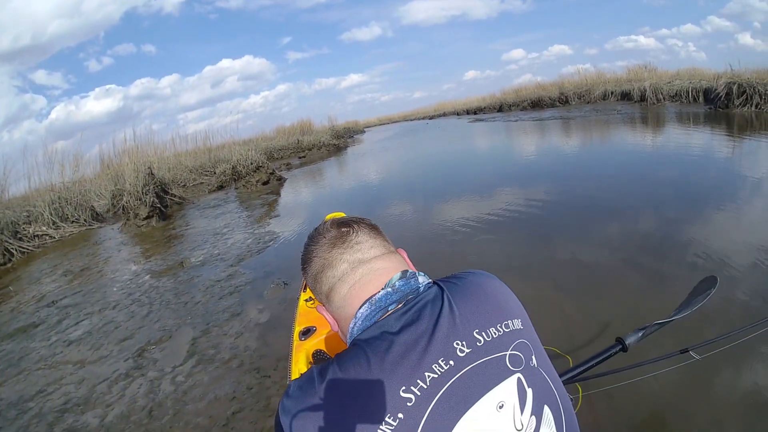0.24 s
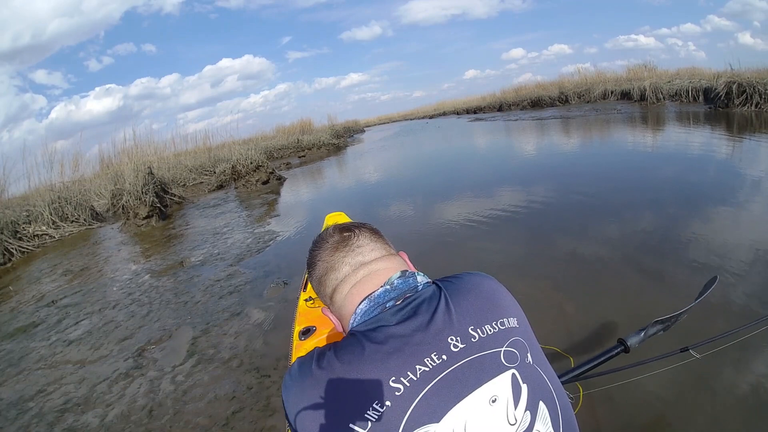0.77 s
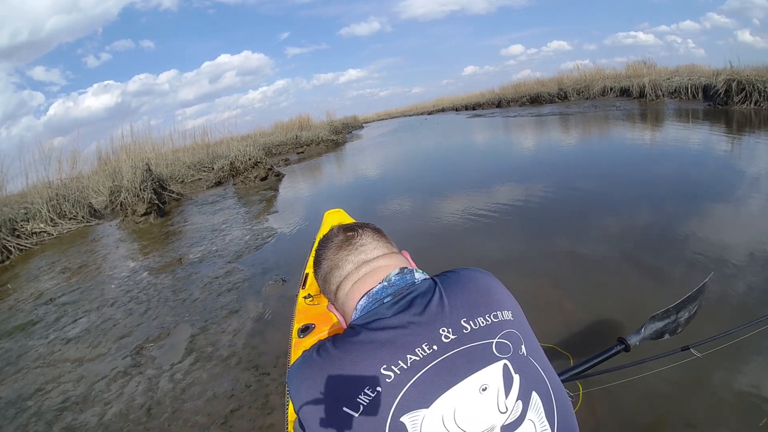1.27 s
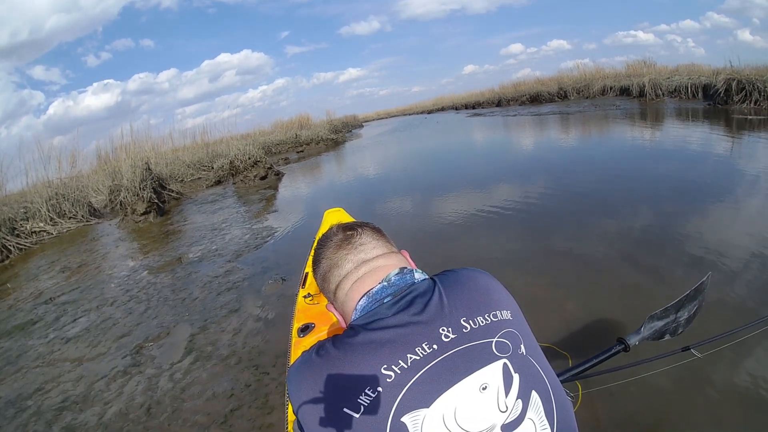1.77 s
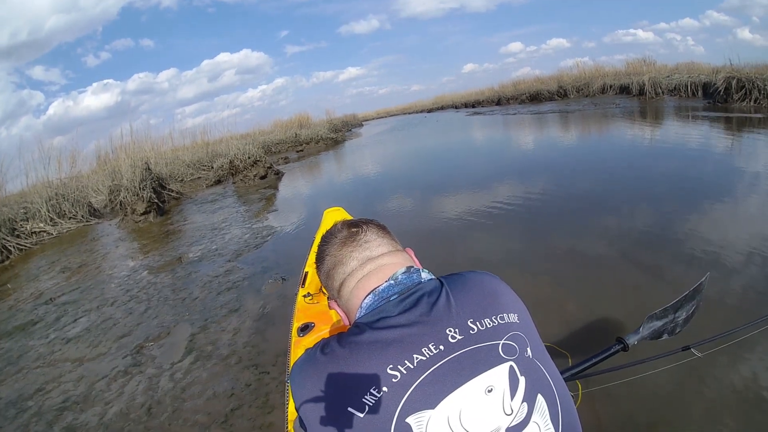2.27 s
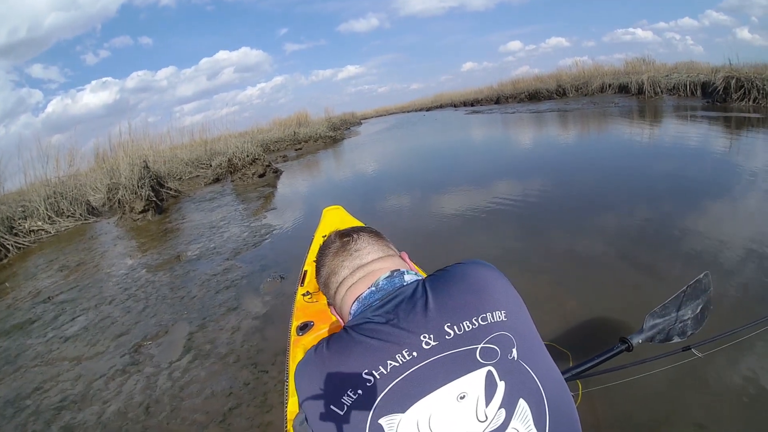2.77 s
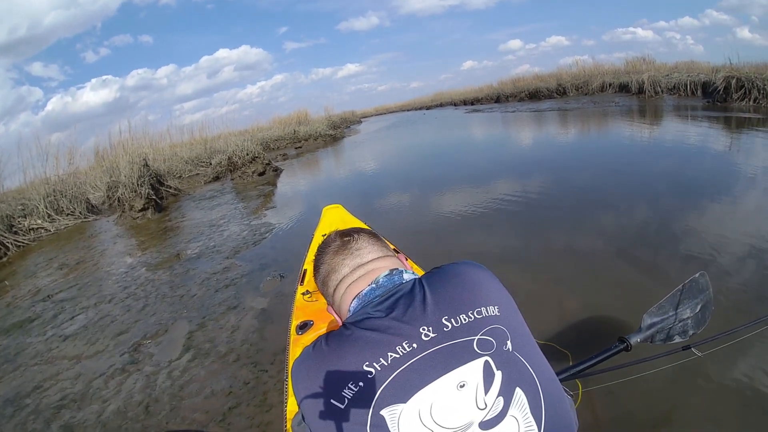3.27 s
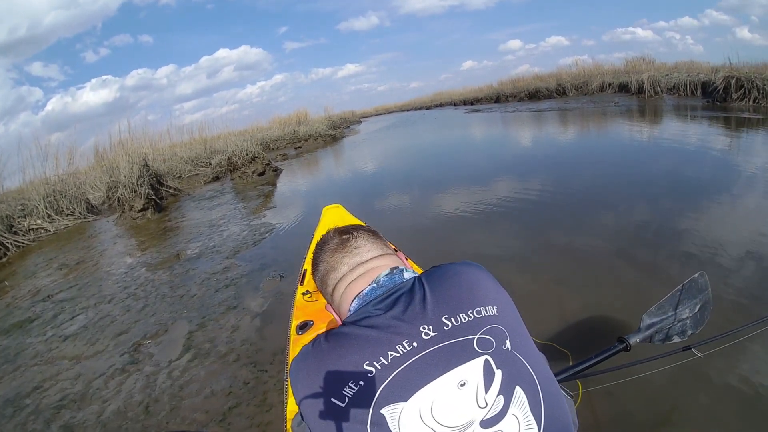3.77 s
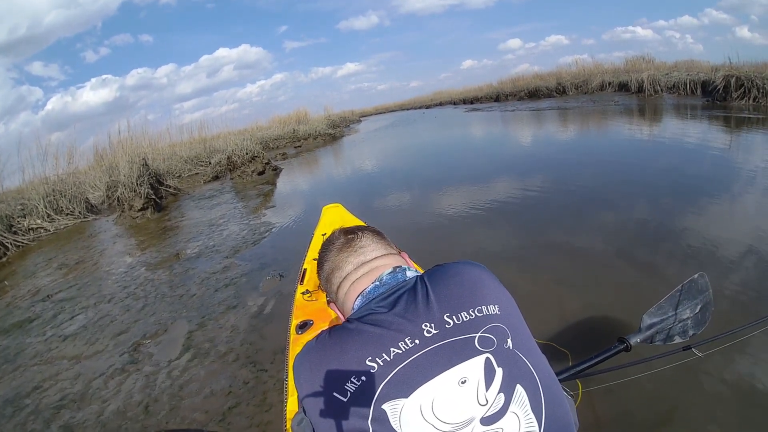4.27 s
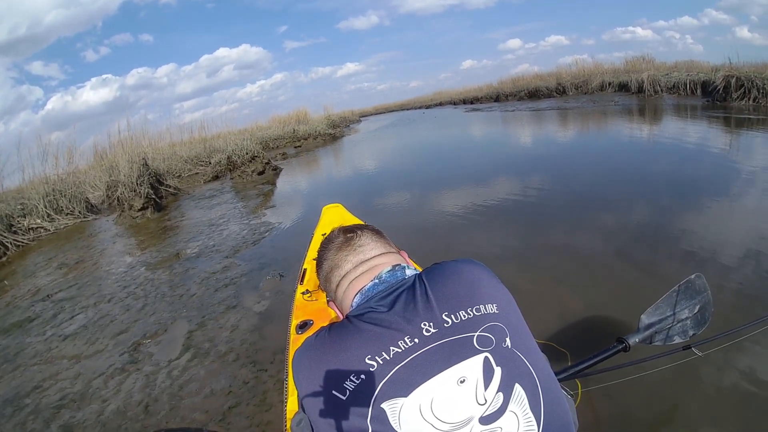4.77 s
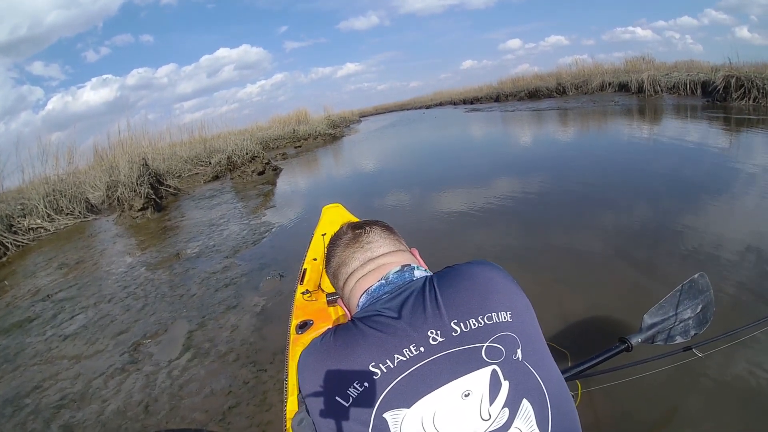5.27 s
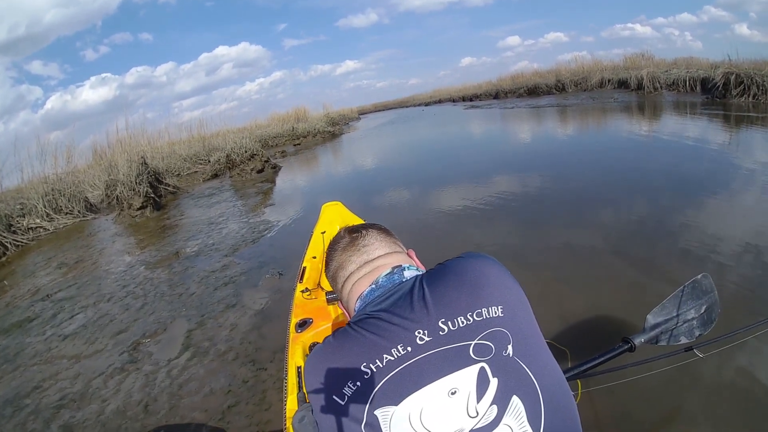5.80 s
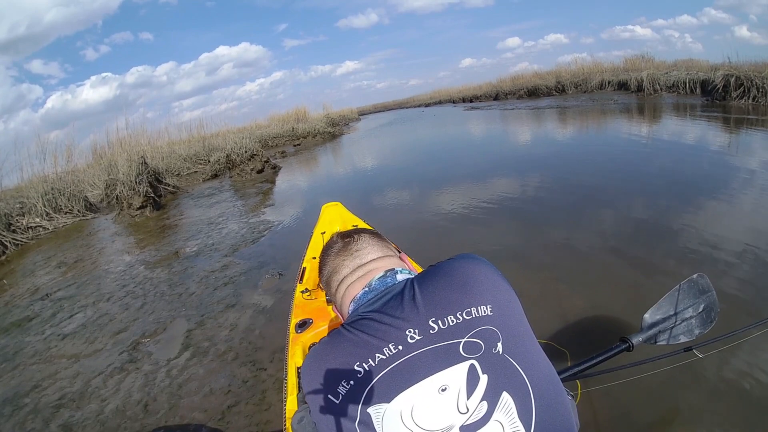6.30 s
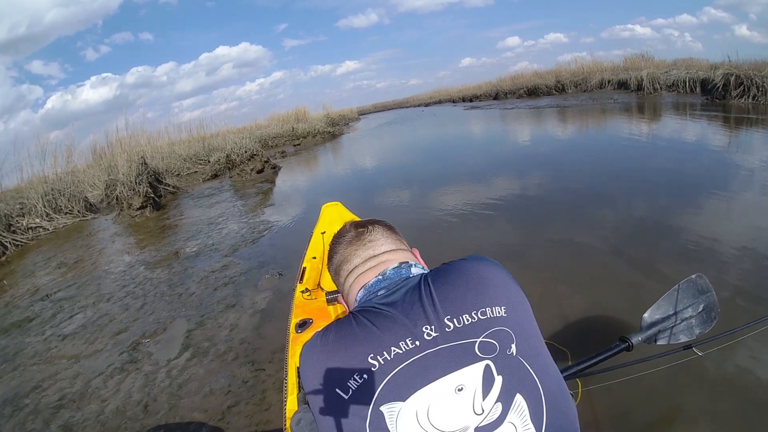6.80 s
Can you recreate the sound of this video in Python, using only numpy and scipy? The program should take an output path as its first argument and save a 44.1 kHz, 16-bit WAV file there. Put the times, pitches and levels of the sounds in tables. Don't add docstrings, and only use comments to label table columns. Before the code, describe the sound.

A person moves gear in a hollow plastic boat on still water. Isolated short knocks ring woodily for an instant, with softer low bumps, line ticks and cloth rubbing between them, busiest at the start and around five seconds. A few tiny water plops are barely heard. The microphone is close and dry, with uneven low wind buffeting and very faint hiss beneath.

```python
import sys
import numpy as np
from scipy import signal
from scipy.fft import rfft, irfft
from scipy.io import wavfile
from scipy.ndimage import uniform_filter1d

SR = 44100
rng = np.random.default_rng(int(sys.argv[2]) if len(sys.argv) > 2 else 0)


def wav_record(signal):
    frames = np.transpose(np.atleast_2d(signal))
    bounded = np.clip(frames, -1, 1)
    quanta = np.round(bounded * 32767).astype(np.int16)
    wavfile.write(sys.argv[1], SR, quanta)


def gain_from_db(level_db):
    decades = np.asarray(level_db, float) / 20
    return 10 ** decades


N = 310905
TIME = np.arange(N) / SR

# start_s, peak_db, contact_ms, low_modes_db, high_modes_db
KNOCKS = [(0.5275, -39.5, 0.31, -2, 21), (0.9465, -22, 0.76, 1.5, 10.5), (2.4042, -41.5, 0.93, 7, 10),
          (2.4677, -38.5, 0.57, -15, 31), (2.4697, -28.5, 0.36, -5, 18), (2.5941, -19.5, 0.43, 3, 9.5),
          (2.6635, -39, 1, 4, -3), (4.3113, -20.5, 0.5, 3, 10), (4.676, -42.5, 0.84, 7, -8),
          (5.106, -37.5, 0.88, 3, -3), (5.31, -35.5, 0.43, 6, -8), (5.8572, -15, 0.33, 0, 9),
          (5.8998, -34.5, 0.31, -12, 25), (6.8555, -42, 0.17, -7, 14)]
# pitch_hz, level_db, t60_s
HULL_MODES = [(400, -22, 0.04), (540, -4, 0.056), (668, -7.5, 0.029), (745, 1, 0.041), (827, 9, 0.014),
              (1150, -12.5, 0.0094), (1453, -24, 0.018), (2730, -24, 0.0081), (3200, -29.5, 0.01),
              (4060, -26, .008), (4870, -55, 0.0056)]
HULL_SIGNS = [1, -1, -1, -1, 1, 1, 1, 1, 1, 1, -1]
# start_s, peak_db, pitch_hz, t60_s
THUDS = [(0.151, -28, 139, 0.041), (0.233, -28.5, 192, 0.093), (.251, -31.5, 203, 0.11),
         (.372, -40, 150, 0.053), (0.473, -40, 197, 0.055), (0.852, -33, 186, 0.07),
         (1.534, -44, 266, 0.049), (2.264, -34.5, 123, 0.028), (2.324, -38.5, 95.5, 0.22),
         (2.595, -37, 165, 0.094), (4.685, -39, 211, 0.057), (5.105, -20, 177.5, 0.043),
         (5.124, -24, 120, 0.063), (5.309, -25, 163, 0.013), (5.317, -35.5, 75, 0.087),
         (6.73, -46.5, 223, 0.09)]
# start_s, peak_db, centre_hz
SCRATCHES = [(0.0743, -52.5, 2870), (0.175, -60, 2000), (0.2194, -43.5, 2000), (0.3176, -42.5, 2780),
             (.3561, -48, 1980), (.4688, -53, 2600), (.7936, -53.5, 2580), (0.967, -57, 2670),
             (1.0417, -52.5, 2570), (1.351, -60, 2920), (1.4087, -61, 2290), (1.5183, -54.5, 3460),
             (1.7955, -63, 3200), (1.8552, -61, 3160), (1.908, -67, 2120), (1.927, -54.5, 2600),
             (2.0314, -57, 4220), (2.2463, -57, 2650), (2.3787, -54, 2150), (3.3333, -59.5, 2800),
             (4.4937, -57.5, 2580), (4.6687, -58.5, 1950), (4.7107, -57, 2160), (5.0545, -59, 2350),
             (5.1527, -57, 2180), (5.1811, -37.5, 2900), (5.2772, -45.5, 3370), (5.3016, -43.5, 2950),
             (6.729, -44, 2500), (6.8547, -54.5, 2680)]
# start_s, hull_db, scratch_above_hull_db
TAPS = [(0.0322, -43, -8), (.2374, -40.5, -4), (0.2517, -37, -1.5), (0.2953, -48, -7), (.373, -46.5, -16),
        (0.4613, -42.5, -19), (.7213, -51, -12), (.7771, -51, -27), (1.1117, -42, -10), (2.0005, -50, -22),
        (2.0164, -48, -17), (2.121, -48.5, -12), (2.1717, -46, -7), (2.6094, -54, -5), (2.8454, -49, -15),
        (3.1927, -51, -5.5), (3.4318, -47.5, -23), (3.459, -40.5, -43), (3.756, -50.5, -18),
        (3.7698, -48, -7), (4.0247, -43, -14), (4.2244, -48, -21), (4.8888, -51.5, -25), (5.1065, -43, -7),
        (5.1194, -37.5, -20), (5.319, -43, -18), (5.5224, -51, -6.5), (5.7607, -51.5, -20),
        (6.2877, -50, -26), (6.3555, -50.5, -28)]
# start_s, air_db, scratch_above_air_db
SNAPS = [(.0992, -74, 5), (.1756, -65, 0), (0.2515, -55, 6), (0.316, -64, 5), (.3561, -61, 8),
         (.373, -72, 8), (.5525, -67, 2), (1.1124, -74, 9), (.899, -69, 8), (1.478, -65, 2),
         (1.6614, -68.5, 6), (2.1725, -64.5, 2), (3.0976, -68.5, -9), (3.3333, -67, -3), (4.137, -70.5, -9),
         (4.2697, -68, 8.5), (5.1063, -72, 8), (5.153, -69, 14), (5.183, -64, 5), (5.2774, -68, 10),
         (5.3013, -66, 5), (6.6038, -64, -6)]
SCRATCH_HULL_DB, SCRATCH_AIR_DB, TAP_AIR_DB, SNAP_HULL_DB = -15.5, -39, -40, 3.5
TAP_HZ, SNAP_HZ, TICK_T60_S = 2220, 2670, 0.033
# start_s, length_s, hull_db, surface_db
SCUFFS = [(0, 0.15, -52.5, -62), (0.157, 0.076, -64, -62.5), (0.212, 0.075, -51, -53.5),
          (0.279, 0.15, -54, -59), (0.42, 0.14, -59, -67.5), (0.635, 0.36, -60, -79),
          (1.01, 0.18, -61.5, -68), (1.495, 0.11, -67.5, -65.5), (1.864, 0.14, -69.5, -69.5),
          (1.978, 0.12, -55.5, -68), (2.136, 0.16, -57, -65), (2.316, 0.15, -64.5, -73.5),
          (2.453, 0.034, -60, -63.5), (2.542, 0.13, -70, -70), (2.756, 0.29, -66.5, -74),
          (3.187, 0.023, -55.5, -79), (3.363, 0.14, -56.5, -82), (3.748, 0.071, -59, -87),
          (3.939, 0.16, -57.5, -80), (4.397, 0.095, -67.5, -86), (4.67, 0.032, -62, -84),
          (5.098, 0.14, -53.5, -69), (5.268, 0.054, -50.5, -54), (5.297, 0.065, -50.5, -69),
          (5.557, 0.16, -65.5, -74), (5.903, 0.071, -75, -75.5), (6.214, 0.055, -62, -84),
          (6.28, 0.1, -55.5, -97), (6.568, 0.072, -69.5, -80), (6.66, 0.13, -54, -78.5)]
SCUFF_AIR_DB, SCUFF_AIR_FOLLOWS = -75.5, 0.73
# start_s, peak_db, start_hz, end_hz, length_s
DROPS = [
    (.010, -46, 1480, 1560, 0.0069),
    (0.114, -38.5, 720, 756, 0.024),
    (1.128, -50, 917, 795, 0.03),
    (1.523, -56.5, 1090, 1940, 0.047),
    (3.01, -49.5, 2080, 2660, 0.008),
    (4.736, -54, 1930, 2140, 0.013),
]
# time_s, level_db
BREEZE = [(0.0, -41), (0.59, -52.5), (1.02, -43.5), (1.53, -50.5), (2.83, -42.5), (3.69, -42), (3.89, -48),
          (4.69, -50), (5.1, -46), (5.56, -45.5), (6.28, -51), (7.05, -51)]
# centre_s, level_db, length_s
BUFFETS = [(0.997, -39.5, 0.076), (1.215, -47, 0.034), (1.796, -56, 0.059), (2.295, -45.5, 0.32),
           (2.528, -45, 0.09), (2.662, -43, .12), (3.031, -47, 0.04), (3.246, -40, 0.13),
           (3.56, -48.5, 0.27), (5.32, -47, 0.061), (5.685, -40, 0.15), (5.868, -53, 0.13),
           (6.144, -48.5, 0.14)]
FLUTTER_DB, FLUTTER_FOLLOWS, FLUTTER_WANDERS_DB, MEAN_BREEZE_DB = -54.5, 0.17, 2, -50
SHAKE_DB, SHAKE_S = -12.5, 0.34
# pitch_hz, density_db
QUIET = [(120, -6.5), (200, -2), (310, -10.5), (620, -14.5), (1900, -23.5), (2900, -23.5), (4800, -28.5),
         (13000, -30)]
QUIET_DB = -69
HULL_HUM_DB = -7.5
PICTURE_TICK_DB, PICTURE_HZ, FIRST_PICTURE_S = -82.5, 29.97, 0.0068


def unit(x):
    return x / np.sqrt(np.mean(x ** 2))


def band(x, lo_hz, hi_hz, order=2):
    edges_hz = [lo_hz, min(hi_hz, 0.45 * SR)]
    return signal.sosfilt(signal.butter(order, edges_hz, "band", fs=SR, output="sos"), x)


def ring(x, hz, t60):
    pole = np.exp(2j * np.pi * hz / SR - np.log(1000) / (max(t60, 0.002) * SR))
    return signal.lfilter([1], [1, -pole], x).imag


def push(ms, size=6000):
    t = np.arange(size) / SR / (max(ms, 0.1) / 1000)
    return np.where(t < 1, np.sin(np.pi * t) ** 2, 0)


def walk(rate_hz):
    hold = int(SR / rate_hz)
    steps = np.repeat(rng.standard_normal(N // hold + 1), hold)
    smooth = uniform_filter1d(uniform_filter1d(steps, hold), hold)
    return unit(smooth[:N])


def swell(s, length):
    return np.sin(np.pi * np.clip((TIME - s) / length, 0, 1))


def add(out, s, sound, peak_db):
    i = max(int(s * SR), 0)
    sound = sound[:N - i]
    out[i:i + len(sound)] += sound * gain_from_db(peak_db) / np.abs(sound).max()


def knocks():
    out = np.zeros(N)
    for s, peak_db, ms, low_db, high_db in KNOCKS:
        force = push(ms)
        modes = []
        for (hz, db, t60), sign in zip(HULL_MODES, HULL_SIGNS):
            modes.append(sign * gain_from_db(db) * ring(force, hz, t60))
        low, main, high = sum(modes[:3]), sum(modes[3:5]), sum(modes[5:])
        add(out, s, gain_from_db(low_db) * low + main + gain_from_db(high_db) * high, peak_db - 1.0)
    return out


def thuds():
    out = np.zeros(N)
    for s, peak_db, hz, t60 in THUDS:
        force = push(350 / hz)
        flex = ring(force, hz, t60)
        flex = flex + gain_from_db(-10) * ring(force, 1.3 * hz, 0.29 * t60)
        flex = flex - gain_from_db(-8.0) * ring(force, 2.44 * hz, 0.2 * t60)
        add(out, s, band(flex, 0.15 * hz, 3300), peak_db)
    return out


def ticks():
    out, t = np.zeros(N), TIME[:3000]
    rows = []  # start_s, scratch_db, centre_hz, hull_db, air_db
    for s, db, hz in SCRATCHES:
        rows.append((s, db, hz, db + SCRATCH_HULL_DB, db + SCRATCH_AIR_DB))
    for s, db, up_db in TAPS:
        rows.append((s, db + up_db, TAP_HZ, db, db + TAP_AIR_DB))
    for s, db, up_db in SNAPS:
        rows.append((s, db + up_db, SNAP_HZ, db + SNAP_HULL_DB, db))
    envelope = np.minimum(t / 0.0014, 1) * gain_from_db(-60 * t / TICK_T60_S)
    for s, peak_db, hz, hull_db, air_db in rows:
        noise = rng.standard_normal(len(t))
        slips = noise * envelope
        wide = gain_from_db(-13) * band(slips, 1200, 4300)
        scratch = band(slips, hz / 1.17, hz * 1.17) + wide
        air_low_hz = 5000 + 2500 * abs(np.tanh(noise[0]))
        add(out, s, band(scratch, 900, 4800), peak_db)
        add(out, s, band(slips, 380, 1220), hull_db - 0.5)
        add(out, s, band(slips, air_low_hz, 13500), air_db + 7)
    return out


def patches(grains, centres_hz, patchy_db):
    return sum(unit(band(grains, hz / 1.194, hz * 1.13)) * gain_from_db(patchy_db * walk(45)) for hz in centres_hz)


def scuffs():
    gain = np.zeros((3, N))
    for s, length, hull_db, surface_db in SCUFFS:
        air_db = SCUFF_AIR_DB + SCUFF_AIR_FOLLOWS * (surface_db + 61.5)
        stroke = np.abs(swell(s, length)) ** 0.81
        gain += gain_from_db(np.array([hull_db, surface_db, air_db]))[:, None] * stroke
    catch_db = np.array([3 * walk(70) + 3 * walk(300) for layer in range(3)]) + 2.5 * walk(350)
    grains = rng.standard_normal((3, N)) * gain_from_db(catch_db)
    boom = unit(band(grains[0], 157, 790))
    boom = boom + gain_from_db(-7.5) * unit(ring(grains[0], HULL_MODES[3][0], 0.079))
    surface = patches(grains[1], (1300, 1850, 2600, 3600), 2.8)
    air = patches(grains[2], (5400, 7800, 11200), 3)
    return sum(g * unit(layer) for g, layer in zip(gain, (boom, surface, air)))


def drops():
    out = np.zeros(N)
    for s, peak_db, start_hz, end_hz, length in DROPS:
        share = np.linspace(0, 1, int(length * SR))
        phase = 2 * np.pi * np.cumsum(start_hz + (end_hz - start_hz) * share) / SR
        envelope = np.sin(np.pi * share ** 0.75) ** 1.6
        unevenness = gain_from_db(2.5 * walk(400)[:len(share)])
        add(out, s, envelope * np.sin(phase) * unevenness, peak_db)
    return out


def lapping(count=900):
    out, t = np.zeros(N), TIME[:300]
    for when, pitch, size in rng.random((count, 3)):
        hz = 700 * 5.5 ** pitch
        bubble = np.sin(2 * np.pi * hz * t) * t * np.exp(-t * hz / 1.9)
        peak_db = -75 - 0.83 * np.log(size + 0.0215) - 6 * pitch
        add(out, when * TIME[-600], bubble, peak_db)
    return out


def wind():
    time_s, level_db = np.transpose(BREEZE)
    breeze = gain_from_db(np.interp(TIME, time_s, level_db))
    rumble = breeze * gain_from_db(-3 + 2.0 * walk(9))
    for s, db, length in BUFFETS:
        rumble = rumble + gain_from_db(db) * swell(s - length / 2, length) ** 2
    flutter = gain_from_db(FLUTTER_DB + FLUTTER_WANDERS_DB * walk(7.4))
    flutter = flutter * (breeze / gain_from_db(MEAN_BREEZE_DB)) ** FLUTTER_FOLLOWS
    for s, db, hz, t60 in THUDS:
        onset = np.clip((TIME - s) / 0.016, 0, 1)
        decay = gain_from_db(-60 * np.abs(TIME - s) / SHAKE_S)
        flutter = flutter + gain_from_db(db + SHAKE_DB) * onset * decay
    noise = rng.standard_normal((4, N))
    sway = unit(band(noise[0], 5.63, 15.3)) * gain_from_db(4.0)
    low = unit(band(noise[1], 18.4, 52.4)) * gain_from_db(1.16 * walk(12))
    quick = unit(band(noise[2], 58, 118)) * gain_from_db(1.3 * walk(14))
    deck = unit(band(noise[3], 135, 250)) * gain_from_db(2.2 * walk(18))
    return rumble * (low + sway) + gain_from_db(-2.0) * flutter * quick + gain_from_db(-46) * np.sqrt(flutter) * deck


def camera():
    hz, db = np.transpose(QUIET)
    log_hz = np.log(np.fft.rfftfreq(N, 1 / SR) + 1)
    shape = gain_from_db(np.interp(log_hz, np.log(hz), db, left=-60))
    hiss = unit(irfft(rfft(rng.standard_normal(N)) * shape, N))
    ripples_db = 2.4 * walk(14) + 3.2 * walk(60)
    hiss += gain_from_db(-13) * unit(band(hiss, 300, 3500) * gain_from_db(ripples_db))
    lap = rng.standard_normal(N) * gain_from_db(2.5 * walk(14))
    hiss += gain_from_db(HULL_HUM_DB) * unit(ring(lap, 810, 0.027))
    since = (TIME - FIRST_PICTURE_S) % (1 / PICTURE_HZ)
    burst = rng.standard_normal(N) * np.exp(-since / 0.0018)
    tick = unit(band(burst, 1950, 3050, order=3))
    return gain_from_db(QUIET_DB) * hiss + gain_from_db(PICTURE_TICK_DB) * tick


def scene():
    contacts = knocks() + thuds() + ticks() + scuffs()
    water = drops() + lapping()
    return (contacts + water + wind() + camera())[None]


def top_cut(x):
    return signal.sosfilt(signal.butter(12, 13030, fs=SR, output="sos"), x)


def record(dry):
    return top_cut(dry)


dry = scene()
out = record(dry)
wav_record(out)
```